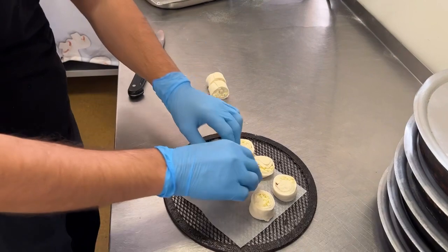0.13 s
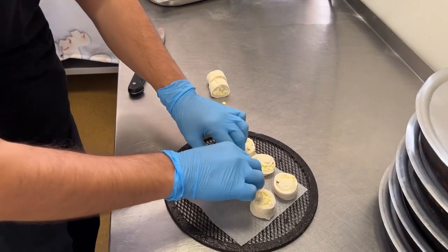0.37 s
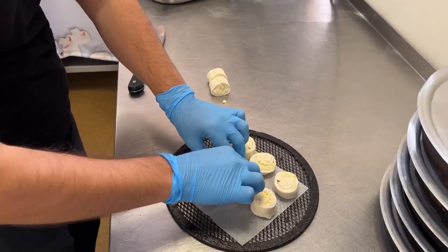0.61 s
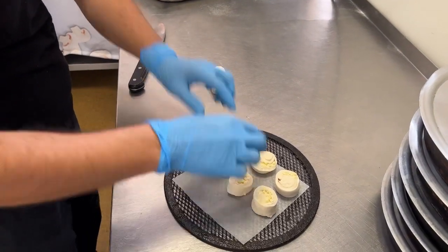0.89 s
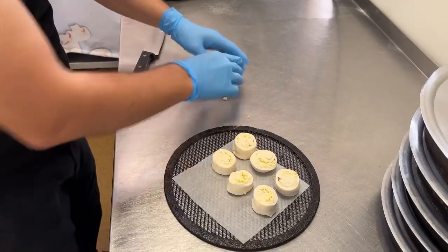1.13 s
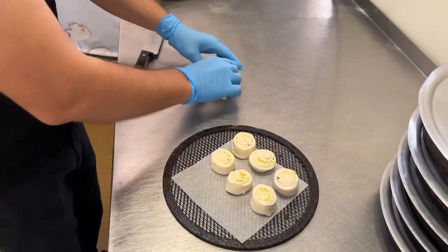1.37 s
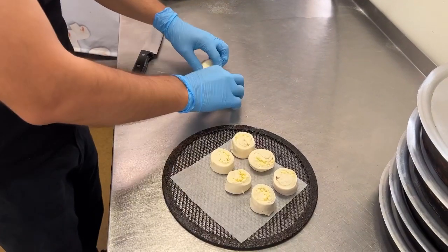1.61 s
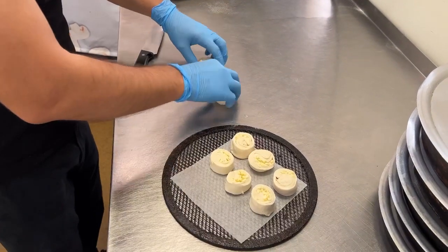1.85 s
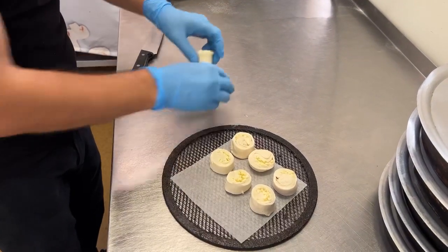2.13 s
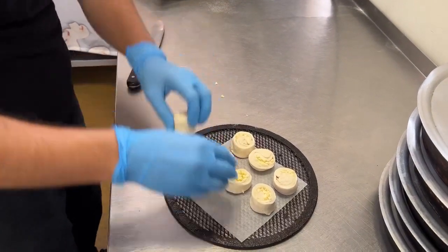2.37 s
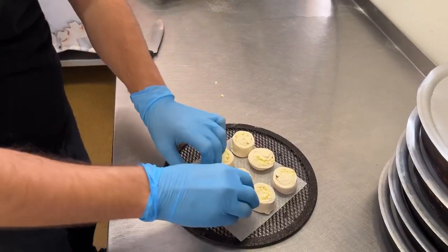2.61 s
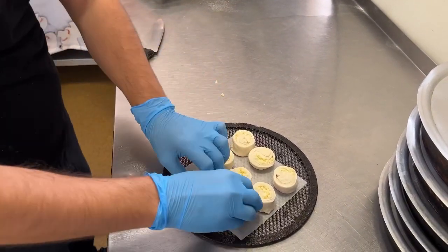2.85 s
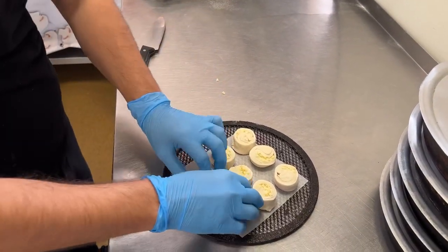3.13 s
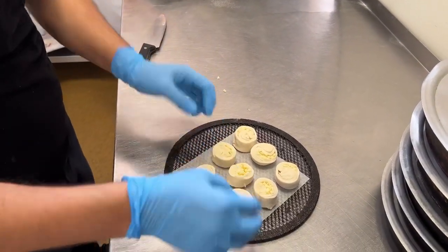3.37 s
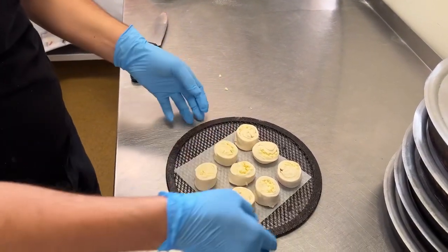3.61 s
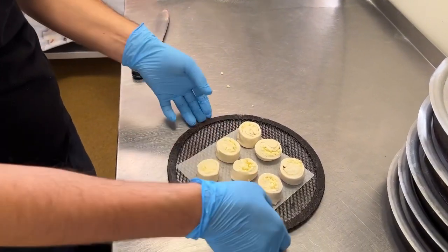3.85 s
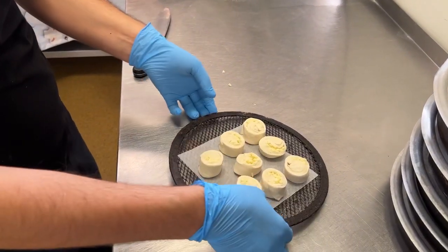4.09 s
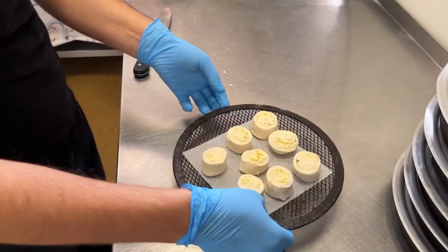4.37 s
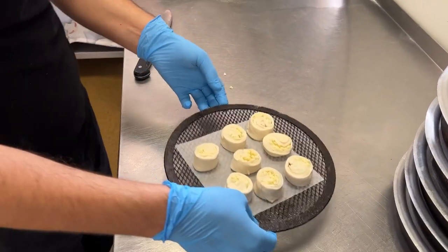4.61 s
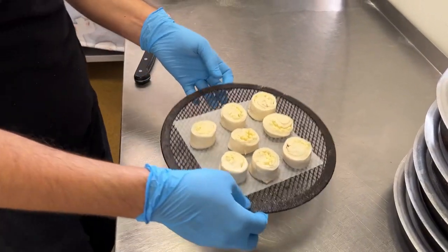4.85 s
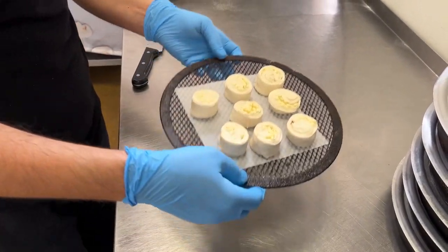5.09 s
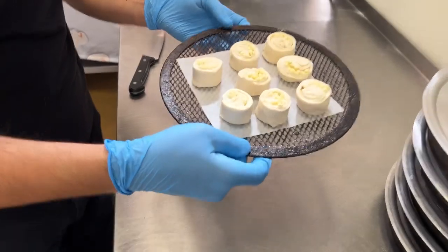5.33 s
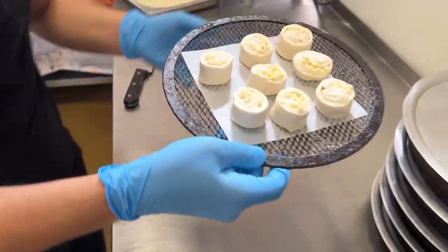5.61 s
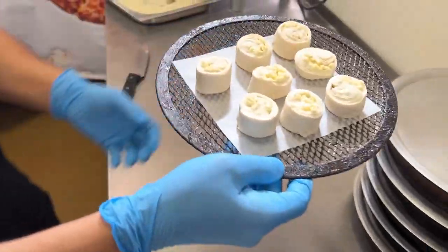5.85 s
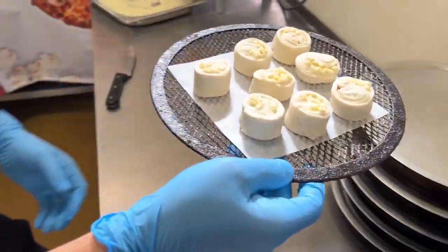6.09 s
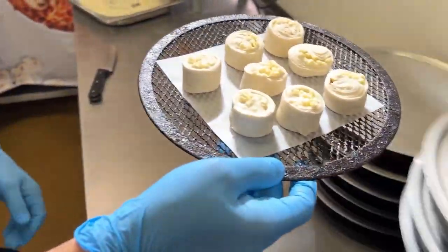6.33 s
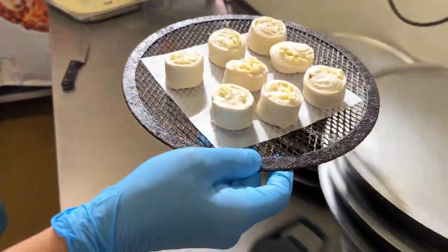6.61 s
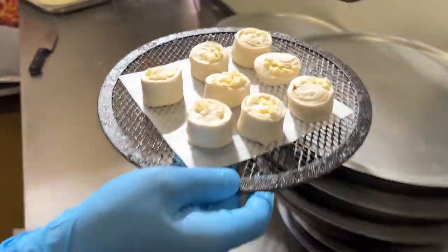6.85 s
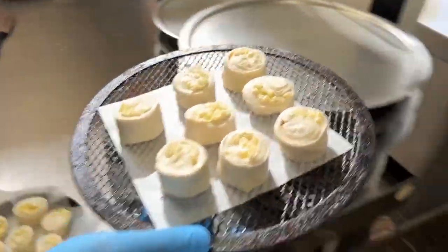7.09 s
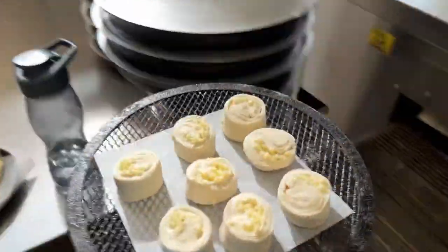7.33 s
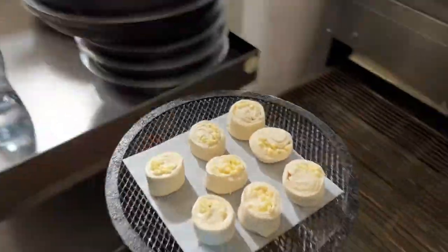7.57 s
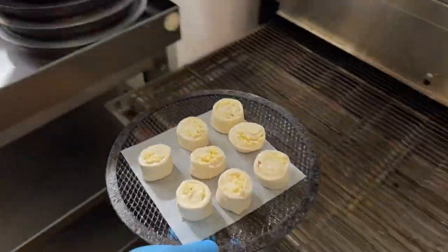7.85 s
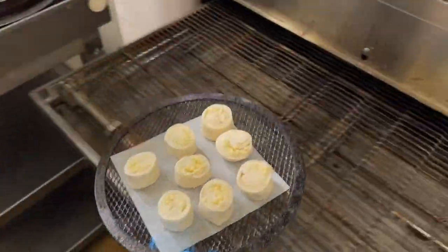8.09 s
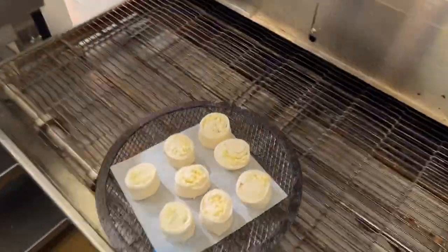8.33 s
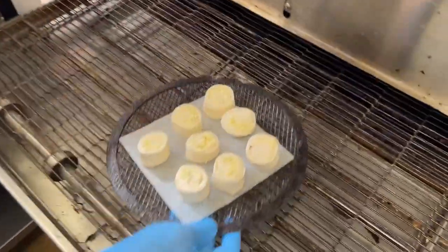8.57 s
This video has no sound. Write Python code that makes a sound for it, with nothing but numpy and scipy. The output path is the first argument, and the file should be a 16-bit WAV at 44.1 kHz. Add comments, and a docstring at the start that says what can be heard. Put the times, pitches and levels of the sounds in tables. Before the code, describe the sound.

A constant low-heavy ventilation drone fills a commercial kitchen, with hollow resonances and faint motor whine. Quiet glove clicks and paper rubs dot the foreground. A turn reveals a hollow duct tone, then the handheld stereo microphone nears the oven, bringing a sudden bassy surge, brief hooting resonance and finally close, hissing air jets. No voices are heard.

```python
"""A steel kitchen with a stereo microphone held by hand over a work table, about 5 m from an open conveyor oven.
From the start blowers and extractors roar as coloured noise, two narrow bands of noise ring as standing waves,
fan, motors and mains hum as sines, and gloves tick and rustle on baking paper as short noise and clicks.
Near 5.8 s a turn uncovers a hollow duct; from 6.2 s the oven mouth comes closer and its roar grows.
At 6.9 s the bass bursts clear of a stack of trays; at 8.3 s the microphone faces the hissing jets, 1.1 m off."""
import sys
import numpy as np
from scipy import signal
from scipy.fft import rfft, irfft, next_fast_len
from scipy.io import wavfile
from scipy.ndimage import uniform_filter1d

SR = 44100
rng = np.random.default_rng(int(sys.argv[2]) if len(sys.argv) > 2 else 0)


def wav_out(sig):
    """Save sig, one row per channel (or a flat mono array), as 16-bit PCM at SR to the path in sys.argv[1]."""
    wavfile.write(sys.argv[1], SR, np.round(np.clip(np.atleast_2d(sig).T, -1, 1) * 32767).astype(np.int16))


def how_loud(loudness_db):
    """Turn decibels into a plain amplitude multiplier (0 dB gives 1, 20 dB gives 10)."""
    steps = np.asarray(loudness_db, float) / 20
    return 10 ** steps


N = 383669
SIZE = next_fast_len(N)
HZ = np.maximum(np.arange(SIZE // 2 + 1) * SR / SIZE, 1)  # frequency of each bin
SECONDS = np.arange(N) / SR
SHAFT_HZ, BLADES = 48.43, 3

# Colours give the relative density of a noise per Hz.
# air roar of the room: pitch_hz, level_db
ROOM_COLOUR = [(28, -4.5), (45, -3), (90, 6), (120, 11.5), (210, 13), (270, 9), (520, 0), (780, -6),
               (1020, -6), (1620, -5.5), (1810, -8.5), (1850, -15), (2030, -15), (4500, -29.5), (9300, -34),
               (10500, -51), (15700, -47.5)]
# weaker peaks and dips of ducts and steel panels in the room roar: pitch_hz, width_hz, lift_db
PANEL_PEAKS = [(122, 14, 3), (507, 49, 8), (1001, 157, 6), (89, 14, -3), (136.7, 5.1, -3.5), (167.5, 8, -4),
               (258, 8.7, -4), (243.5, 19, -7.5), (341, 10, -3), (356, 27, 3), (386, 47, 3), (414, 7.4, -2),
               (441, 6.8, -2), (456, 20, 4.5), (496, 7.2, -3), (563, 14, -3.5), (690, 12, 0.5),
               (790, 7, 2.5), (906, 14, 5), (1890, 80, -0.5), (2330, 450, 2), (6400, 250, -0.5),
               (7200, 400, -2.5)]
# air jets through the oven mouth: pitch_hz, level_db
MOUTH_COLOUR = [(40, -30), (75, -5), (115, -17), (190, 1.5), (270, -5.5), (380, -20), (530, -17.5),
                (880, -22), (1150, -21.5), (1550, -24), (1930, -24), (2050, -32), (2700, -34.5),
                (3400, -41), (5500, -49.5), (9000, -72.5)]
# a dip from cancelling echoes off the belt, and a slight lift: pitch_hz, width_hz, lift_db
BELT_ECHOES = [(1980, 75, -15.5), (546, 23, 1)]
# path of the microphone to the oven mouth: time_s, distance_m
APPROACH = [(6.2, 5.1), (6.7, 4), (6.95, 2.4), (7.4, 1.56), (7.9, 1.22), (8.3, 1.12), (8.7, 1.04)]
# lower and upper standing wave excited by the roar: pitch_hz, width_hz
STANDING_WAVES = [(60.5, 6.5), (239.5, 10)]
# level of the lower, 60 Hz band over time: time_s, level_db
LOWER_WAVE_LEVEL = [(0, -42), (2.3, -51), (2.9, -33), (3.35, -28), (3.85, -39), (4.05, -23), (4.55, -27.5),
                    (4.75, -34), (5.1, -27), (5.45, -31), (5.7, -31), (5.95, -30), (6.3, -34), (7.3, -37),
                    (7.55, -27.5), (8.7, -46)]
# gaps under the oven that hoot in passing: pitch_hz, width_hz, relative level_db
OVEN_GAPS = [(492.4, 14, -1.5), (359.5, 18, -1)]
# blade tone of the fan: time_s, level_db
BLADE_LEVEL = [(0, -30), (.25, -25), (1.5, -27.5), (1.62, -30), (2.25, -25), (2.4, -36.5), (2.85, -31),
               (3.1, -38.5), (4, -39.5), (4.5, -29.5), (4.75, -39), (5.3, -33.5), (6.4, -38.5), (7.3, -36),
               (7.9, -23.5), (8.7, -25.5)]
# transformer and motor hum on twice the mains: multiple, level_db at the table, change_db at the oven
HUM_LINES = [(3, -36.5, -8.5), (2, -38, -2.5)]
# further hum and smaller motors: pitch_hz, level_db
STEADY_TONES = [(69.3, -41.5), (100.05, -41), (217.5, -43.5), (400.2, -47.5)]
# whine of motor slots, split by the shaft rate: pitch_hz, level_db
SLOT_WHINE = [(2261, -70), (2357, -70), (2405, -66), (2455, -74), (2503, -75.5), (2553, -72), (3470, -81.5),
              (6536, -83), (6584, -85), (6681, -83.5), (6729, -86.5), (6778, -88.5), (8056, -88.5)]
# gloves rubbing on paper: start_s, length_s, level_db
RUBS = [(0.346, 0.08, -57), (1.429, .06, -62), (2.293, 0.26, -63), (2.823, 0.12, -60), (3.187, 0.061, -58),
        (3.561, 0.13, -61), (3.932, 0.079, -56), (4.341, .08, -61), (6.53, .05, -57), (7.13, 0.16, -54),
        (7.66, 0.064, -57), (8.07, 0.067, -49.5)]
# rubbing noise: pitch_hz, level_db
RUSTLE_COLOUR = [(2500, -15), (5000, 2.5), (7000, -1), (8500, 1), (10500, -9.5), (12500, -5), (15700, -7.5)]
# single ticks: start_s, snap level_db, body level_db, t60_s
TICKS = [(0.3525, -54, -49, .016), (0.3715, -44, -50, .012), (0.374, -50, -46, .012),
         (0.4105, -45, -43, .008), (0.456, -50, -54, .01), (1.4694, -56, -54, .014),
         (2.8266, -52, -52, .014), (2.8505, -50, -50, .009), (2.894, -41, -54, .008),
         (3.1848, -41, -43, .004), (3.1945, -47, -60, .006), (3.931, -52, -52, .016),
         (5.601, -62, -40, 0.0055), (6.544, -51, -54, .016), (7.1505, -56, -48, .012),
         (7.6694, -52, -48, .018), (7.803, -56, -42, .008), (8.063, -60, -47, .006),
         (8.0726, -50, -56, .018), (8.082, -49, -56, .008), (8.0905, -41, -50, .012)]
# brighter part of a tick: pitch_hz, level_db
SNAP_COLOUR = [(4000, -19), (6500, -7), (8200, 1.5), (9600, -3), (10500, -14), (12500, -11), (15700, -16)]
# duller part of a tick: pitch_hz, level_db
BODY_COLOUR = [(1200, -7.5), (2000, 5), (3800, 9), (5500, 7), (7000, -5), (9000, -24)]
# two microphone ports on one body: pitch_hz, likeness (0-1) in the room, likeness (0-1) at the oven,
# lag_rad of the left port in the room, lag_rad of the left port at the oven
PORTS = [(30, .99, 1, 0, 0), (150, .97, 1, .4, .3), (250, .95, 1, .5, .4), (350, .92, .99, .45, .4),
         (450, .83, .95, 1, .3), (550, .7, 1, .7, 0), (650, .5, .95, 1.5, -.1), (750, .05, .9, .3, -.4),
         (870, .5, .7, -1.1, -.6), (1020, .72, .72, -.4, -.2), (1200, .52, .75, .4, 0),
         (1400, .48, .8, 1, .8), (1620, .55, .7, 2.1, 1.2), (1870, .55, .85, 2.6, 2.1),
         (2150, .3, .6, 1.3, -.4), (2450, .2, .55, 1.8, .3), (2800, .3, .55, 4, -1),
         (3250, .4, .6, 4.2, -2), (3750, .3, .45, 6, 0), (6200, 0.5, 0.23, 6, -.3),
         (7000, .15, .2, 4.6, -1.5), (7800, 0.6, 0.46, 8, 0), (8400, .93, 0.93, 6, 0),
         (8830, .93, 0.87, 7.5, .5), (10020, 0.99, 1, 9, 3), (15300, 1, .96, 18.5, 12.5)]
# balance of the ports for noise: pitch_hz, left over right level_db
PORT_BALANCE = [(60, 0.5), (110, 1.5), (200, 0), (380, -2), (700, -6), (1290, 0.5), (2380, -2), (4400, 3),
                (8120, -0.5), (15000, 0.0)]


def in_time(rows):
    """The second column of a table as a value per sample."""
    seconds, values = np.transpose(rows)
    return np.interp(SECONDS, seconds, values)


def over_hz(points):
    """A spectrum in dB on every frequency bin."""
    hz, db = np.transpose(points)
    return np.interp(np.log(HZ), np.log(np.maximum(hz, 1)), db)


def peak(hz, width):
    """Magnitude of one resonance, 1 on top."""
    return 1 / np.sqrt(1 + ((HZ - hz ** 2 / HZ) / width) ** 2)


def shaped(colour, peaks):
    """Gain of a broad colour with narrow peaks and dips on it."""
    return how_loud(over_hz(colour) + sum(db * peak(hz, width) ** 2 for hz, width, db in peaks))


def drift(rate):
    """Slow random wandering of spread 1; a higher rate wanders faster."""
    knots = rng.standard_normal(int(N / SR * 40) + 2)  # 40 per second
    slow = uniform_filter1d(knots, size=max(int(20 / rate), 1))
    return np.interp(SECONDS * 40, np.arange(len(slow)), slow / slow.std())


def step(centre_s, rise_s):
    """Smooth change from 0 to 1."""
    return .5 + .5 * np.tanh((SECONDS - centre_s) / rise_s)


def at_oven():
    """Move of the microphone: 0 at the table, 1 at the oven."""
    return np.interp(SECONDS, [6.24, 7.1], [0, 1])


def facing_jets():
    """Turn of the microphone until it meets the jets head-on, 0 to 1."""
    return step(8.3, .12)


def port_phase(hz, near):
    """Phase in radians at left and right: half the lag each way."""
    table = np.array(PORTS)
    lag = np.interp(hz, table[:, 0], table[:, 4 if near else 3])
    return lag * np.array([[-.5], [.5]])


def at_ports(source, near):
    """One wave reaches both ports with a phase lag; the rest of the field is diffuse and differs per port."""
    table = np.array(PORTS)
    like = np.clip(np.interp(HZ, table[:, 0], table[:, 2 if near else 1]), 0, 1)
    direct = source * np.exp(1j * port_phase(HZ, near))
    diffuse = np.abs(source) * np.exp(2j * np.pi * rng.random((2, len(HZ))))
    both = np.sqrt(like) * direct + np.sqrt(1 - like) * diffuse
    return both * how_loud(over_hz(PORT_BALANCE) * np.array([[.5], [-.5]]))


def air(gain, near=False):
    """Turbulent noise of a given colour at both ports, as a spectrum of rms 1."""
    both = at_ports(gain * rfft(rng.standard_normal(SIZE)), near)
    return both * SIZE / np.sqrt(np.sum(np.abs(both) ** 2))


def air_sound(gain, near=False):
    """The same turbulent noise as two channels in time."""
    return irfft(air(gain, near), SIZE)[:, :N]


def roar(level_db, treble_db, bass_db, chest_db, gain, near):
    """Air noise whose four registers flicker in level independently."""
    flicker_db = 1
    noise = air(gain, near)
    below_bass, below_middle, below_treble = [1 / (1 + (HZ / hz) ** 6) for hz in (330, 720, 2800)]
    registers = [(below_bass, bass_db),
                 (below_middle - below_bass, chest_db),
                 (below_treble - below_middle, 0),
                 (1 - below_treble, treble_db)]
    out = 0
    for share, lift_db in registers:
        band = irfft(noise * share, SIZE)[:, :N]
        out = out + band * how_loud(level_db + lift_db + flicker_db * drift(7))
    return out


def room_roar():
    """Blowers and extractors mixed by the room, with duct and panel peaks."""
    return roar(level_db=-28, treble_db=-.5, bass_db=3, chest_db=1,
                gain=shaped(ROOM_COLOUR, PANEL_PEAKS), near=False)


def mouth_roar():
    """Air jets through the oven mouth: louder as 1 / distance, the bass screened by trays at first."""
    clear_s, clear_rise_s = 6.91, .023
    screened_db, boom_db, boom_fade_s = -6, 10.5, .14
    metres = in_time(APPROACH)
    clear = step(clear_s, clear_rise_s)
    boom = boom_db * np.exp(-np.maximum(SECONDS - clear_s, 0) / boom_fade_s)
    bass_db = 1.54 + screened_db * (1 - clear) + boom * clear
    # seen from aside, farther off, the jets are thinner
    treble_db = -1.1 + 1 * (metres - 1) + 2 * facing_jets()
    chest_db = 2 - 1 * (metres - 1) + 2.5 * facing_jets()
    level_db = -20 - 20 * np.log10(metres)
    return roar(level_db, treble_db, bass_db, chest_db, shaped(MOUTH_COLOUR, BELT_ECHOES), near=True)


def duct_outlet():
    """A broad hollow band of air noise, uncovered as the microphone turns from the table."""
    pitch_hz, width_hz, level_db = 548, 183, -38
    return how_loud(level_db) * step(5.75, .43) * air_sound(peak(pitch_hz, width_hz) ** 2)


def jet_hiss():
    """A bright band of air noise that opens up as the microphone faces the jets."""
    pitch_hz, width_hz, level_db = 3850, 500, -61
    return how_loud(level_db) * facing_jets() * air_sound(peak(pitch_hz, width_hz) ** 2, near=True)


def moving_echoes(sound):
    """Echoes comb the spectrum into fine peaks and dips; each small move of the hand brings new ones."""
    room_t60_s, wet_db, ripple_from_hz = .2, -7.5, 250
    hop = 32768  # samples from one pattern of echoes to the next
    size = 2 * hop
    hz = np.arange(hop + 1) * SR / size
    wet = how_loud(wet_db) * hz ** 2 / (hz ** 2 + ripple_from_hz ** 2)
    decay = how_loud(-60 * np.arange(size) / SR / room_t60_s)
    window = signal.windows.hann(size, False)
    padded = np.pad(sound, [(0, 0), (hop, size)])
    out = np.zeros_like(padded)
    for at in range(0, N + hop, hop):
        tail = rfft(rng.standard_normal(size) * decay)
        tail = tail / np.sqrt(np.mean(np.abs(tail) ** 2))
        # only the magnitude of direct sound plus tail is used
        ripple = np.abs(1 + wet * tail) / np.sqrt(1 + wet ** 2)
        piece = rfft(padded[:, at:at + size] * window)
        out[:, at:at + size] += irfft(piece * ripple, size)
    return out[:, hop:hop + N]


def resonant_band(hz, width, gain):
    """Air noise ringing in one resonance, its random swells partly evened out."""
    steadiness = .7
    band = air_sound(peak(hz, width) ** 2)
    power = uniform_filter1d(np.mean(band ** 2, axis=0), size=4096)
    return band * gain / (power + .11) ** (.5 * steadiness)


def standing_waves():
    """Two room resonances; the lower band swells and fades unevenly, the upper is weaker at the oven."""
    lower, upper = STANDING_WAVES
    upper_db = -31 - 3 * at_oven() + .8 * drift(1.2)
    return resonant_band(*lower, how_loud(in_time(LOWER_WAVE_LEVEL))) + resonant_band(*upper, how_loud(upper_db))


def passing_hoots():
    """Gaps under the oven resonate while the microphone passes them."""
    start_s, hold_s, rise_s, level_db = 6.88, .49, .096, -31.5
    passing = step(start_s, rise_s) - step(start_s + hold_s, rise_s)
    return sum(resonant_band(hz, width, passing * how_loud(level_db + db)) for hz, width, db in OVEN_GAPS)


def tone(hz, level_db):
    """A sine with slight wavering of level and phase, lagging between the ports."""
    waver_db, slip_rad = 1.07, .2
    phase = 2 * np.pi * (hz * SECONDS + rng.random()) + slip_rad * drift(2.2)
    wave = np.sin(phase + port_phase(hz, near=False))
    return np.sqrt(2) * how_loud(level_db + waver_db * drift(3)) * wave


def fan():
    """Shaft tone, three-blade tone and its fourth harmonic, which stands out when facing the jets."""
    blade_hz = BLADES * SHAFT_HZ
    blade_db = in_time(BLADE_LEVEL)
    overtone_db = blade_db - 25.5 + 14.5 * facing_jets()
    return tone(blade_hz, blade_db) + tone(SHAFT_HZ, -42) + tone(4 * blade_hz, overtone_db)


def hum_and_motors():
    """Multiples of twice the mains, weaker at the oven, with small motors and their slot whine."""
    twice_mains_hz = 100.05
    hum = sum(tone(k * twice_mains_hz, db + change_db * at_oven()) for k, db, change_db in HUM_LINES)
    return hum + sum(tone(hz, db) for hz, db in [*STEADY_TONES, *SLOT_WHINE])


def rustle():
    """Gloves rub paper: noise lumpy from grain to grain, with faint restless rubbing between strokes."""
    edge_s, grain_db = .027, 1.8
    lumps = np.repeat(rng.standard_normal(N // 128 + 1), 128)[:N]
    noise = air_sound(how_loud(over_hz(RUSTLE_COLOUR)), near=True)
    strokes = sum(how_loud(db) * (step(s, edge_s) - step(s + length, edge_s)) for s, length, db in RUBS)
    fidget = how_loud(-65 + 2.5 * drift(6))
    return noise * np.hypot(strokes, fidget) * how_loud(grain_db * lumps)


def ticks():
    """A sharp contact and a puff of crackle, bright snap over duller body, gone in a few milliseconds."""
    rise_s, click_over_puff_db = .0008, 10
    age = SECONDS[:4096]
    lag = np.exp(1j * port_phase(HZ, near=True))
    out = 0
    for column, colour in enumerate([SNAP_COLOUR, BODY_COLOUR]):
        gain = how_loud(over_hz(colour))
        puffs, contacts = np.zeros(N), np.zeros(SIZE)
        for start_s, *levels_db, t60_s in TICKS:
            at = int(start_s * SR)
            level_db = levels_db[column]
            puffs[at:at + len(age)] += how_loud(level_db - 60 * age / t60_s) * np.minimum(age / rise_s, 1)
            contacts[at + int(rise_s * SR)] = how_loud(level_db + click_over_puff_db)
        clicks = irfft(rfft(contacts) * gain / gain.mean() * lag, SIZE)[:, :N]
        out = out + clicks + puffs * air_sound(gain, near=True)
    return out


def scene():
    """All sources at the two ports; the hand's echoes ripple only the broad air noises."""
    broad_air = moving_echoes(room_roar() + mouth_roar() + duct_outlet() + jet_hiss())
    return broad_air + standing_waves() + passing_hoots() + fan() + hum_and_motors() + rustle() + ticks()


def low_pass(x):
    """Removes everything above the highest recorded frequency."""
    return signal.sosfilt(signal.butter(12, 17100, fs=SR, output="sos"), x)


def record(dry):
    """The microphone's bass roll-off below 34 Hz and a steep treble cut at 15.8 kHz."""
    low_cut = signal.butter(3, 34, "high", fs=SR, output="sos")
    top_cut = signal.ellip(10, .5, 70, 15760, fs=SR, output="sos")
    mix = signal.sosfilt(np.vstack([low_cut, top_cut]), dry)
    return low_pass(mix)


dry = scene()
out = record(dry)
wav_out(out)
```